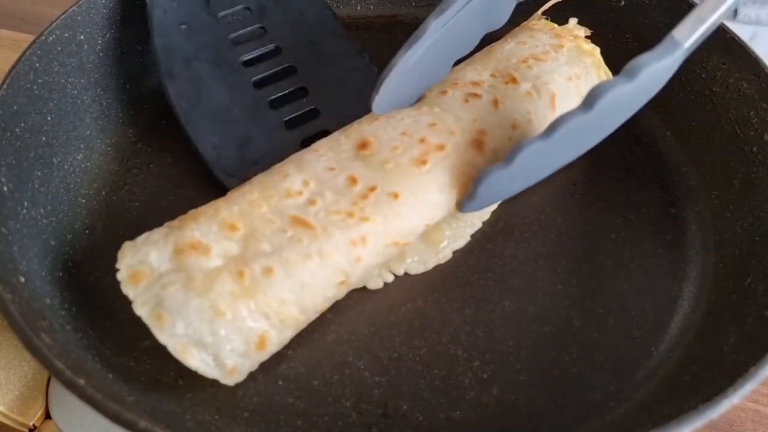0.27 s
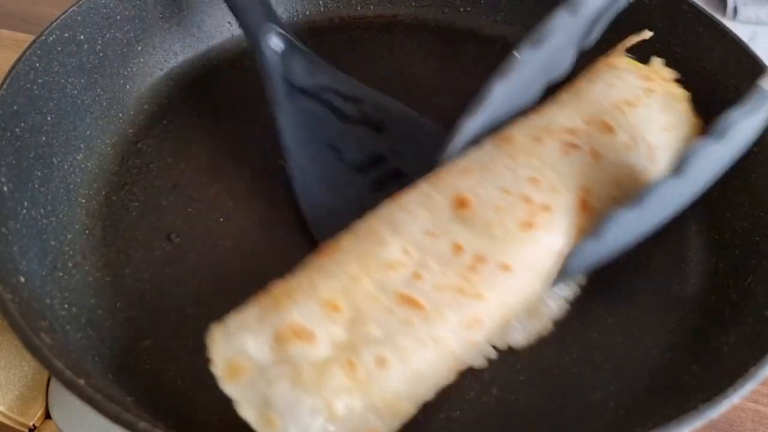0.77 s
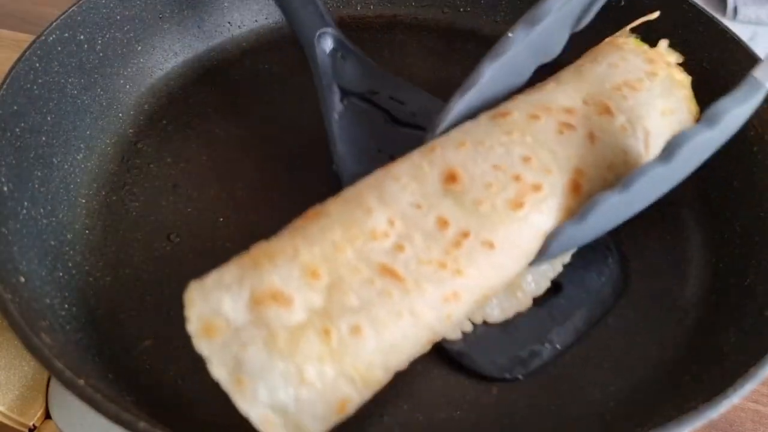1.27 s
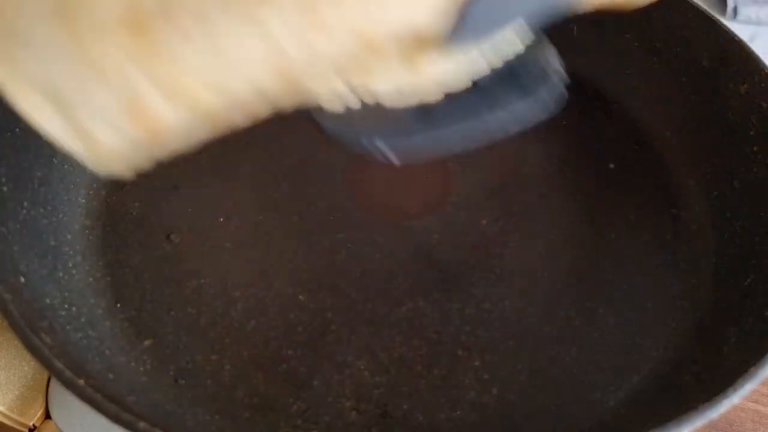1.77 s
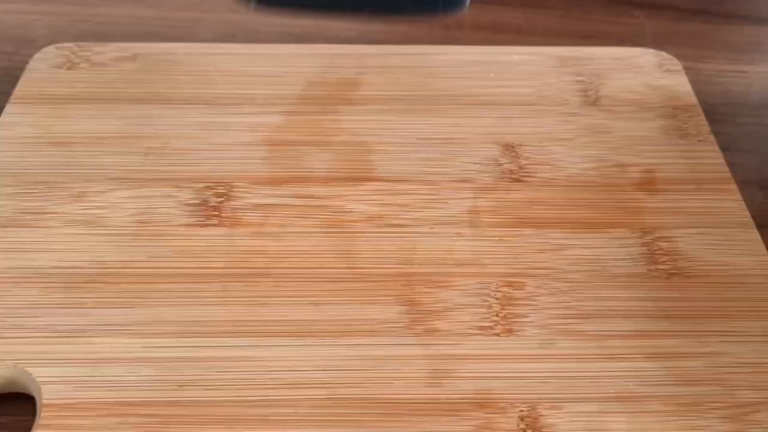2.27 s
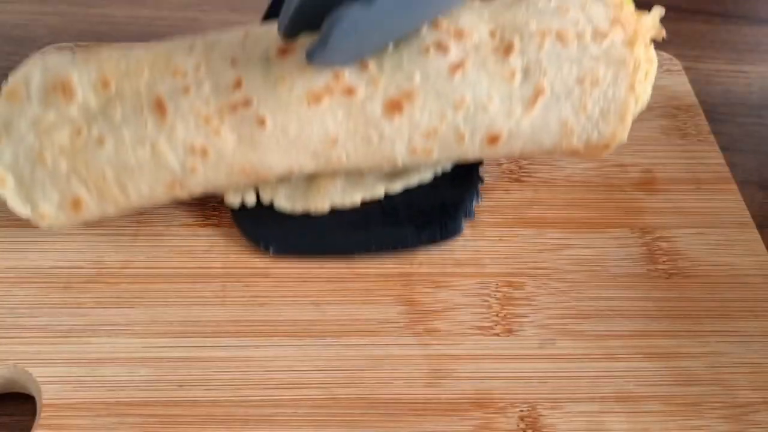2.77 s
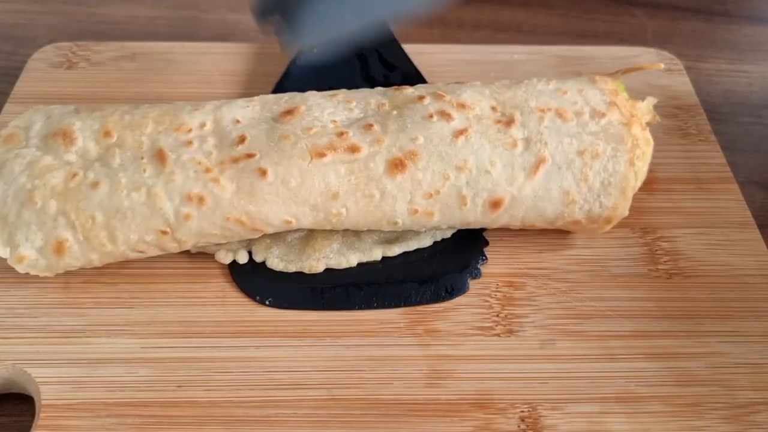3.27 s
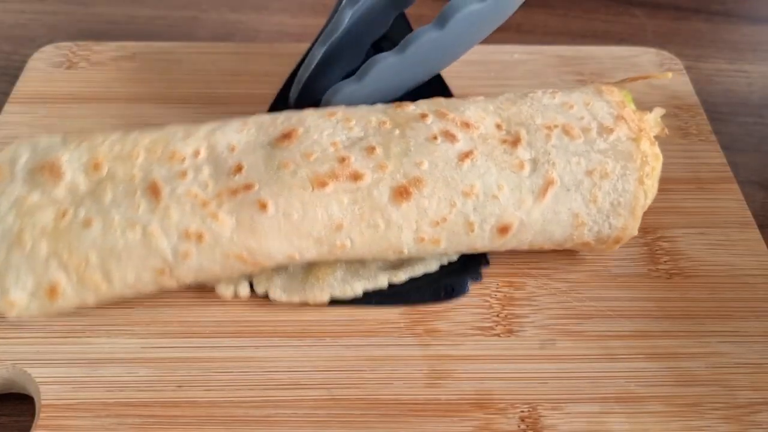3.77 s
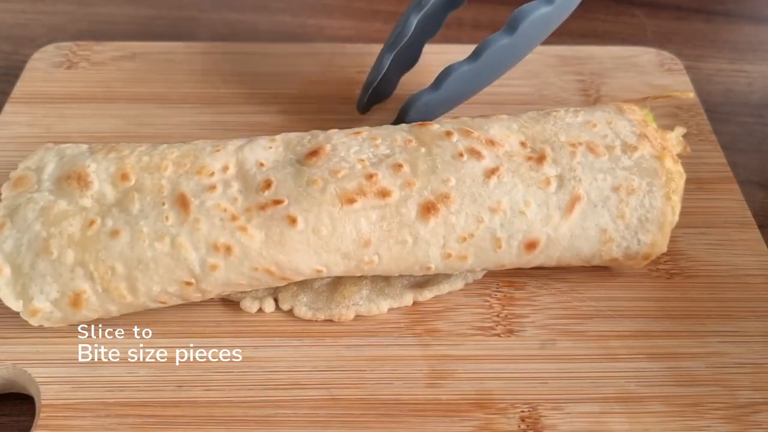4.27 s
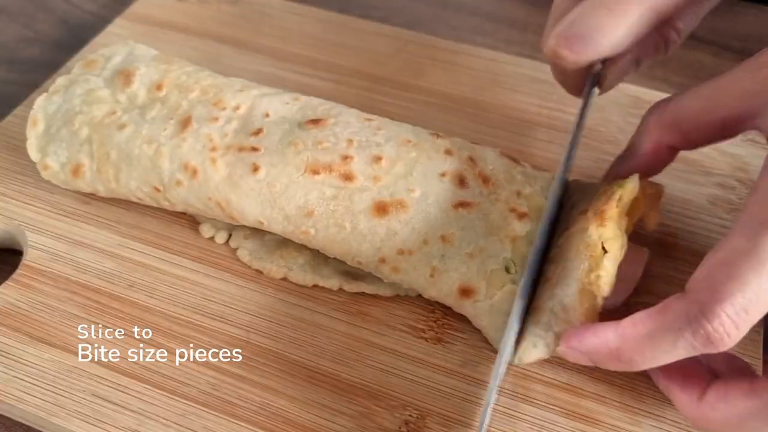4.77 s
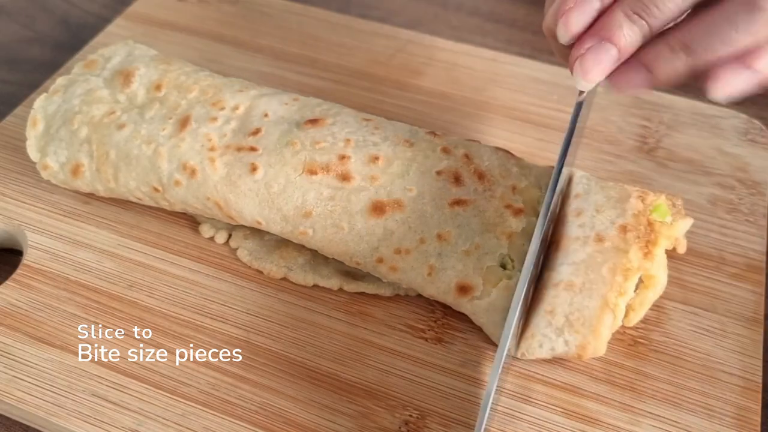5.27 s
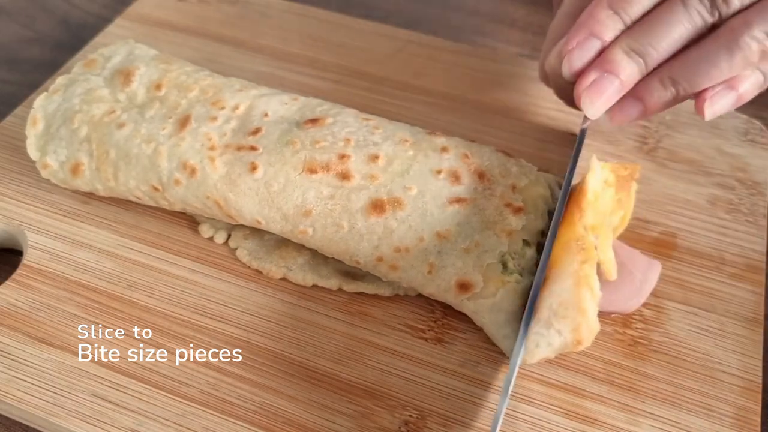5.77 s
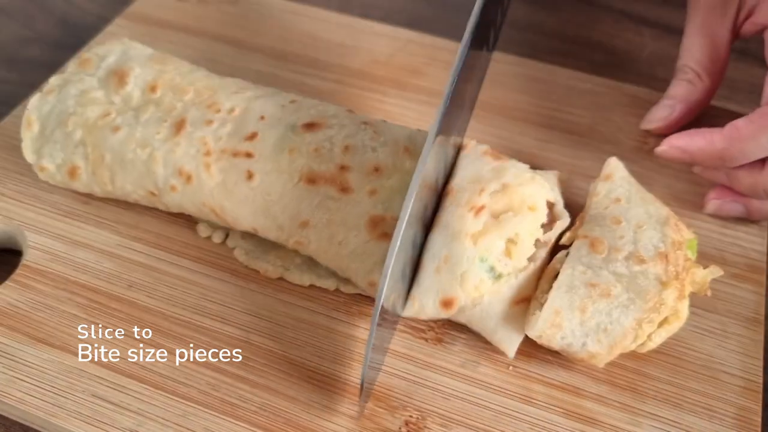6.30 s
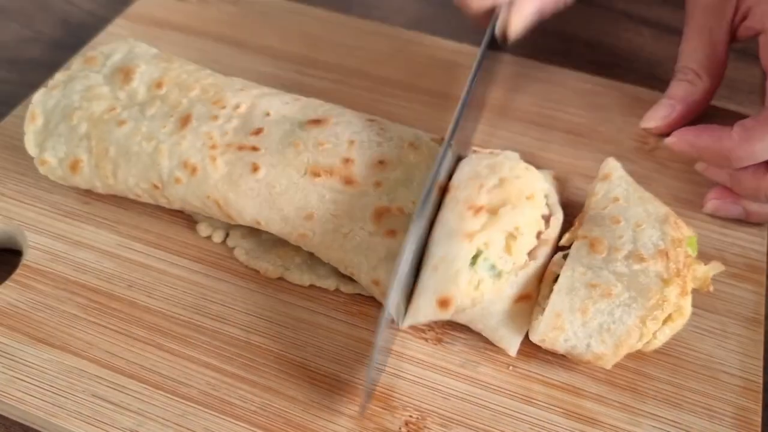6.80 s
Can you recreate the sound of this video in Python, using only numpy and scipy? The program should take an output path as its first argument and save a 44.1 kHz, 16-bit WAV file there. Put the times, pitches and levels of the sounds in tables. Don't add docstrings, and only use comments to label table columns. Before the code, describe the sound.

Close-miked frying: steady fine sizzle over faint low burner rumble, a small ringing knock on the pan, then rough spatula scrapes. The sizzle turns brighter with sharp oil spits, then cuts abruptly to a quiet room. Faint taps, then a spatula drags off a wooden board with a rising squeal. A knife crackles through crust with two hard knocks and low table thuds; the last cut is softer.

```python
import sys
import numpy as np
from scipy import signal
from scipy.fft import rfft, irfft, next_fast_len
from scipy.io import wavfile

SR = 44100
rng = np.random.default_rng(int(sys.argv[2]) if len(sys.argv) > 2 else 0)


def ratio(d):
    e = np.asarray(d, float) / 20
    return 10 ** e


def generate_wav(sig):
    pcm = np.round(np.clip(np.atleast_2d(sig).T, -1, 1) * 32767).astype(np.int16)
    wavfile.write(sys.argv[1], SR, pcm)


N = 310451
T = np.arange(N) / SR

SHOT_EDGES_S = [
    0,
    2.305,
    5.896,
    7.1,
]
# (peak [s], level [dB], rise [s], fall [s], bite [dB])
PAN_STROKES = [(0.56, -30.5, 0.056, 0.06, -3.5), (0.624, -20, 0.12, 0.13, -3.5),
               (0.70, -25.5, 0.065, 0.03, -2), (0.834, -22, 0.02, 0.05, -11),
               (0.866, -20.5, 0.05, 0.1, -2.5), (0.97, -24, 0.093, 0.074, -7),
               (1.085, -21, 0.12, 0.028, -2.5), (1.106, -28.5, 0.03, 0.045, -8.5),
               (1.16, -40, 0.07, 0.07, 2), (1.219, -25, 0.005, 0.03, -6), (1.25, -16.5, 0.035, 0.07, 4.5),
               (1.28, -19, 0.054, 0.028, 5), (1.33, -36.5, 0.038, 0.17, 5)]
# (frequency [Hz], level [dB], t60 [s])
BODY_MODES = [(219.9, -1.5, 0.067), (315.9, 3.5, 0.046), (414, -2, 0.0119), (554, 1, 0.0314)]
# (frequency [Hz], level [dB], t60 [s])
TABLE_MODES = [(79.83, -3.5, 0.248), (132.5, -3.5, 0.1104), (201, -13, 0.0336)]


def rms_one(x):
    return x / np.sqrt(np.mean(x ** 2) + 1e-20)


def filtered(x, order, hz, kind):
    return signal.sosfilt(signal.butter(order, hz, kind, fs=SR, output="sos"), x)


def in_time(*tables):
    columns = []
    for rows in map(np.array, tables):
        columns.append([np.interp(T, rows[:, 0], c, -200, -200) for c in rows[:, 1:].T])
    return np.max(columns, axis=0)


def drift(rate_hz):
    step = 40
    r = np.exp(-2 * np.pi * step * rate_hz / SR)
    slow = signal.lfilter([1], [1, -2 * r, r * r], rng.standard_normal(N // step + 2002))[2000:]
    return np.interp(np.arange(N) / step, np.arange(len(slow)), rms_one(slow))


def colour(x, spectrum):
    hz, db = np.transpose(spectrum)
    size = next_fast_len(N)
    grid = np.log(np.arange(size // 2 + 1) * SR / size + 1)
    gain = ratio(np.interp(grid, np.log(hz), db))
    return rms_one(irfft(rfft(x, size) * gain, size)[:N])


def grains(per_s, spread_db, clump_db):
    born = rng.random(N) < per_s * ratio(clump_db * drift(25)) / SR
    size_db = spread_db * np.minimum(rng.exponential(1, N), 6)
    return born * ratio(size_db) * rng.choice([-1, 1], N)


def layered(x, edges_hz, levels_db, patchy_db, count=2):
    bands = int(count * np.log2(edges_hz[-1] / edges_hz[0]))
    cuts = np.geomspace(edges_hz[0], edges_hz[-1], 1 + bands)
    parts = [filtered(x, 2, c, "band") for c in zip(cuts, cuts[1:])]
    centres, edges = np.log(cuts[1:] * cuts[:-1]) / 2, np.log(edges_hz)
    power, home = np.var(parts, axis=1), np.searchsorted(edges, centres) - 1
    own_db = [10 * np.log10(power[home == k].sum() + 1e-12) for k in range(len(levels_db))]
    wanted = np.array(levels_db) - np.array(own_db)[:, None]
    place = np.interp(centres, (edges[1:] + edges[:-1]) / 2, np.arange(len(wanted)))
    out = 0
    for k, (part, p) in enumerate(zip(parts, place)):
        below, above = wanted[int(p)], wanted[int(np.ceil(p))]
        blend = below * (1 - p % 1) + above * (p % 1)
        out = out + (-1) ** k * part * ratio(blend + patchy_db * drift(22.0))
    return out


def ring(clicks, hz, t60):
    r, w = ratio(-60 / (t60 * SR)), 2 * np.pi * hz / SR
    return signal.lfilter([0, np.sin(w)], [1, -2 * r * np.cos(w), r * r], clicks + 1e-18)


def strike(times, levels_db, modes, soft_s):
    clicks = np.zeros(N)
    clicks[(np.array(times) * SR).astype(int)] = ratio(np.array(levels_db))
    touch = np.hanning(int(soft_s * SR) + 3)
    clicks = np.convolve(clicks, touch / touch.sum())[:N]
    return sum(ratio(db) * ring(clicks, hz, t60) * (-1) ** k for k, (hz, db, t60) in enumerate(modes))


def ticks(rows, cycles, burst_s):
    length = 300
    out, t = np.zeros(N + length), np.arange(length) / SR
    for (s, db, hz, top_db), noise in zip(rows, rng.standard_normal((len(rows), length))):
        swell = t * hz * np.exp(1 - t * hz / cycles) / cycles
        body = np.sin(2 * np.pi * hz * t) * swell
        spray = signal.lfilter([1, -1], [1, -.85], noise * np.exp(-t / burst_s))
        spray_db = min(top_db + 11, db + 1)
        start = int(s * SR)
        out[start:start + length] += ratio(db - 5.5) * body + ratio(spray_db) * spray / np.abs(spray).max()
    return out[:N]


def strokes(rows, ranges=((0, 0, 0), ()), roundness=1.295):
    t = np.arange(N // 16 + 1) * 16 / SR
    out = np.full((len(ranges) - 1, len(t)), -200.)
    for s, db, rise, fall, *bite in rows:
        away = np.where(t < s, (s - t) / abs(rise), (t - s) / abs(fall))
        here = np.searchsorted(SHOT_EDGES_S, t, "right") == np.searchsorted(SHOT_EDGES_S, s, "right")
        level = np.where(here, db - 20 * away ** roundness, -200)
        out = np.maximum(out, [level + gain + share * sum(bite) for _, gain, share in ranges[:-1]])
    return [np.interp(T, t, row) for row in out]


def rubbed(x, rows, ranges, patchy_db, count, roundness=1.295):
    edges_hz = [r[0] for r in ranges]
    return layered(x, edges_hz, strokes(rows, ranges, roundness), patchy_db, count=count)


def sweep(x, hz, width):
    out, state = np.zeros(N), np.zeros(4)
    for i in np.flatnonzero(hz[::256] > 0) * 256:
        r = np.exp(-np.pi * width * hz[i] / SR)
        a = [1, -2 * r * np.cos(2 * np.pi * hz[i] / SR), r * r]
        gain = (1 - r * r) ** 2
        block = x[i:i + 256]
        out[i:i + 256], state = signal.lfilter([gain, 0, -gain], np.convolve(a, a), block, zi=state)
    return out / np.std(out[hz > 0])


def kitchen(x, wet_db):
    t = T[:SR // 2]
    t60_s = 0.424
    tail = rng.standard_normal(len(t)) * ratio(-60 * t / t60_s) * (t > .008)
    tail = filtered(tail, 1, [250, 1500], "band")
    return x + ratio(wet_db) * signal.fftconvolve(x, tail / np.sqrt(np.sum(tail ** 2)))[:N]


def near_reflections(x):
    echoes = [(.013, 0.333), (.029, -0.413), (.047, .45)]   # (delay [s], gain)
    return x + sum(gain * np.roll(x, int(s * SR)) for s, gain in echoes)


def room_tone():
    # (frequency [Hz], density [dB per Hz])
    air_spectrum = [(18, -75), (30, -1.5), (55, 0.5), (100, -7), (353, -9), (382, -18), (413, -8.5),
                    (551, -10.5), (755, -3.5), (1340, -17), (4370, -24), (5830, -26), (15800, -27)]
    # (frequency [Hz], level [dB rms])
    whine = [(3000, -79.5), (6000, -82)]
    tones = sum(ratio(db + 6.5 + 3 * drift(6)) * np.sin(2 * np.pi * hz * T) for hz, db in whine)
    air = colour(rng.standard_normal(N), air_spectrum)
    boom = signal.sosfiltfilt(signal.butter(1, [450, 1100], "band", fs=SR, output="sos"), air)
    boom_lost = 0.697 * (T > SHOT_EDGES_S[2])
    return ratio(-54) * (air - boom_lost * boom) + tones


def frying():
    # (time [s], vigour [dB], bareness of the pan [0-1])
    sizzle = [(0.0, -41, 0.19), (0.43, -40.5, 0), (0.79, -42, 0.11), (1.19, -42.5, 0.1),
              (1.23, -37.5, 0.78), (1.36, -40, 0.64), (1.6, -41.5, 0), (1.7, -38, 0.88), (2.14, -43, 1),
              (2.31, -43, 0.99)]
    # (frequency [Hz], density [dB per Hz])
    fizz_spectrum = [(120, -57), (200, 1.5), (499, -6.5), (621, 5.5), (1040, -4), (2110, -11), (3940, -17),
                     (5400, -16), (7600, -16), (9800, -12), (12500, -2), (14700, 0.5), (15800, -6.5)]
    fizz_edges_hz = [220, 2500, 7000, 10000, 15900]
    covered_db = [-8, -0.03, -2.5, -7.5]
    bare_db = [-20, -1.74, -17, 0.1]
    vigour_db, bare = in_time(sizzle)
    fine = rms_one(grains(9000, spread_db=2.0, clump_db=3.0))
    bursts = signal.lfilter([1], [1, -.96], np.abs(grains(450, spread_db=2.6, clump_db=3.0)))
    share_db = -7 + 6 * np.clip(bare, 0, 1)
    big = rms_one(bursts * rng.standard_normal(N)) * ratio(share_db)
    levels_db = [vigour_db + a + (b - a) * bare for a, b in zip(covered_db, bare_db)]
    return layered(colour(fine + big, fizz_spectrum), fizz_edges_hz, levels_db, patchy_db=1.0, count=3)


def burner():
    # (peak [s], level [dB], rise [s], fall [s])
    jolt = [
        (0.23, -32.5, 0.051, 0.154),
    ]
    flame = filtered(rng.standard_normal(N), 2, [45, 100], "band")
    lift_s, fade_db_per_s = 1.393, 33
    burner_db = -48 - fade_db_per_s * np.maximum(T - lift_s, 0)
    push_db = strokes(PAN_STROKES)[0] - 19.5
    rumble_db = np.max([burner_db, strokes(jolt)[0], push_db], axis=0)
    return ratio(rumble_db) * rms_one(flame)


def spatula_in_pan():
    # (time [s], peak [dB])
    pan_knocks = [
        (0.205, -5),
        (0.2087, -12),
    ]
    # (frequency [Hz], level [dB], t60 [s])
    pan_modes = [(556.3, -3, 0.22), (642, -5.5, 0.33), (765.7, -4, 0.12), (878.6, -1.5, 0.13),
                 (1000, -2, 0.37), (1118, -4, 0.25)]
    blade_modes = [(548, 0, .05), (940, -5, .04), (1400, -12, .015), (2100, -8, .009), (3100, -10, .007)]
    # (frequency [Hz], density [dB per Hz])
    rub_spectrum = [(88, -59), (150, -19.5), (250, -2.5), (460, -89.5), (535, -5), (685, -4), (844, 2.5),
                    (1440, -2.5), (2220, 3.5), (2490, 1.5), (4230, -8), (7480, -25.5), (14000, -29)]
    # (lower edge [Hz], level [dB], share of bite)
    push_ranges = [(273, 0, 0), (1510, -7, 0.906), (4000, -1.3, 0.51), (11000,)]
    catches = grains(6000, spread_db=2.2, clump_db=1.5)
    hum = rms_one(sum(ratio(db) * ring(catches, hz, t60) for hz, db, t60 in pan_modes))
    rub = colour(catches, rub_spectrum) + ratio(-12.5) * hum
    scrape = rubbed(rub, PAN_STROKES, push_ranges, patchy_db=2.0, count=2, roundness=1.452)
    s, db = np.transpose(pan_knocks)
    knock = strike(s, db - 4.0, blade_modes, soft_s=.0001) + strike(s, db - 24, pan_modes, soft_s=0.000346)
    knock = filtered(knock, 2, 440, "high")
    return scrape + kitchen(knock, wet_db=-13)


def oil_spits():
    # (time [s], peak [dB], frequency [Hz], top edge [dB])
    spit_rows = [(0.594, -10, 2630, -18), (0.7246, -9, 13000, -20), (1.3125, -6, 10000, -32),
                 (1.3165, -18.5, 5300, -28), (1.3597, -18, 5510, -28.5), (1.3663, -14, 2630, -20),
                 (1.4045, -10, 4080, -14), (1.482, -18, 5200, -29), (1.6013, -18.5, 5150, -26),
                 (1.7186, -8.5, 12500, -35), (1.8582, -17.5, 10900, -28), (1.884, -18, 10700, -15),
                 (1.95, -14.5, 12100, -33.5), (2.0056, -12.5, 5500, -26.5), (2.0236, -4.5, 11100, -26),
                 (2.0622, -9, 4570, -12), (2.105, -7.5, 12800, -38.5), (2.1175, -16.5, 3550, -25),
                 (2.1712, -14, 3360, -32), (2.2003, -12, 4000, -23), (2.2092, -9.5, 11500, -25.5),
                 (2.2389, -4, 4200, -13), (2.2446, -2.5, 12400, -27.5), (2.2695, -15.5, 12300, -33)]
    return filtered(ticks(spit_rows, cycles=0.638, burst_s=0.00045), 2, 900, "high")


def spatter():
    # (time [s], peak [dB], frequency [Hz], top edge [dB])
    drops = [(1.1902, -23.5, 5400, -36.5), (1.2064, -26, 3620, -40), (1.2164, -24, 3200, -32),
             (1.9214, -31.5, 13600, -32), (1.9667, -19.5, 3500, -44), (1.979, -19.5, 5000, -30),
             (1.9944, -17, 13900, -38), (2.0104, -9.5, 5060, -30), (2.0354, -25, 4620, -31),
             (2.071, -14.5, 6020, -33.5), (2.0834, -20, 11700, -29.5), (2.0886, -19.5, 12800, -29),
             (2.1444, -30.5, 11900, -31.5), (2.2055, -14.5, 11000, -35.5), (2.2458, -13, 12000, -28.5),
             (2.2844, -22, 9370, -36), (2.2964, -16.5, 11200, -38.5)]
    return ticks(drops, cycles=0.7, burst_s=0.00044)


def clacks():
    # (time [s], peak [dB], frequency [Hz], top edge [dB])
    clack_rows = [
        (5.0685, -15, 1713, -35),
        (5.745, -15.5, 1000, -47),
        (5.748, -16.5, 2437, -51.5),
        (3.984, -8.5, 2060, -43.5),
        (4.108, -16, 2580, -46),
        (4.234, -2, 3940, -32),
        (4.327, -17.5, 1404, -42),
        (1.2472, -4, 2600, -30),
    ]
    return ticks(clack_rows, cycles=2.08, burst_s=0.00077)


def bubble_pops():
    # (time [s], peak [dB], frequency [Hz], top edge [dB])
    pop_rows = [(1.3014, -23, 5590, -27), (1.3494, -17.5, 5410, -27), (1.3584, -23, 5510, -27),
                (1.3663, -20.5, 5330, -27), (1.4212, -22, 5750, -39), (1.4254, -24.5, 5000, -35),
                (1.4364, -28.5, 5520, -38), (1.4484, -24.5, 5130, -36.5), (1.4694, -28, 5090, -37),
                (1.4904, -23.5, 5540, -38.5), (1.5904, -28, 5040, -34), (1.7599, -30.5, 5640, -32),]
    return ratio(-3.0) * ticks(pop_rows, cycles=3.0, burst_s=.0015)


def hollow():
    # (peak [s], level [dB], rise [s], fall [s])
    swells = [
        (1.32, -43.5, .04, 0.087),
        (1.45, -47, 0.053, 0.103),
    ]
    fizz = ring(grains(900, spread_db=2.5, clump_db=6.5), 5300, .0025)
    return ratio(strokes(swells)[0]) * rms_one(fizz)


def blows(rows):
    # (frequency [Hz], level [dB], t60 [s])
    face_modes = [(847, -1, 0.0046), (922, 1, 0.01793), (1043, -11, 0.0084), (1748, -22.5, 0.017),
                  (2480, -31, 0.022)]
    loose_modes = [(314.8, -10, 0.135), (599.4, -6.5, 0.117), (717.2, -8.5, 0.126), (794.4, -5.5, 0.17),
                   (883.4, -4.5, 0.157), (999, -12, 0.2), (1064.7, -10.5, 0.07), (1162, -8, 0.062),
                   (1288.5, -13, .08)]
    s, knock_db, body_db, thud_db = np.transpose(rows)
    face = strike(s, knock_db + .5, face_modes, soft_s=0.00016)
    body = strike(s, body_db + 4.5, BODY_MODES, soft_s=0.000564)
    loose = strike(s, body_db - 0.5, loose_modes, soft_s=0.000576)
    thud = strike(s, thud_db - 0.5, TABLE_MODES, soft_s=0.0022)
    return kitchen(face + body, wet_db=-22) + near_reflections(loose) + thud


def table_shake():
    # (peak [s], level [dB], rise [s], fall [s])
    leans = [(2.36, -47.5, 0.068, 0.13), (3.72, -49, 0.047, 0.574), (4.2, -42.5, 0.194, 0.246),
             (4.5, -45.5, 0.021, 0.05), (4.78, -33, 0.0767, 0.134), (4.98, -40, 0.097, 0.085),
             (5.08, -24, 0.0163, 0.0975), (5.58, -27.5, 0.064, 0.159), (5.77, -24.5, 0.03, 0.085),
             (5.89, -27.5, 0.087, 0.1), (5.92, -63.5, 0.03, 0.037), (6.37, -51.5, 0.214, 0.096),
             (6.63, -42.5, 0.031, 0.13), (6.92, -31, 0.027, 0.059), (6.965, -29, 0.05, 0.098)]
    push = rng.standard_normal(N)
    swing = sum(ratio(db) * ring(push, hz, 0.89 * t60) * (-1) ** k
                for k, (hz, db, t60) in enumerate(TABLE_MODES))
    creak = sum(ratio(db) * ring(push, hz, t60) for hz, db, t60 in BODY_MODES[:2])
    level_db = np.maximum(strokes(leans)[0], -65.5)
    return ratio(level_db - 2.5) * (rms_one(swing) + ratio(-6.0) * rms_one(creak))


def drag():
    # (peak [s], level [dB], rise [s], fall [s], bite [dB])
    drag_strokes = [(3.011, -41, 0.01, 0.042, -3), (3.12, -49, 0.175, 0.085, 3),
                    (3.188, -37, 0.025, 0.093, -4.5), (3.235, -40, 0.06, 0.06, -4.5),
                    (3.275, -36.5, 0.053, 0.0246, -7), (3.38, -53, 0.104, 0.116, -0.5),
                    (3.546, -41, 0.0567, 0.061, 0), (3.784, -36.5, 0.0145, 0.039, 1),
                    (3.982, -28, 0.1567, 0.246, 6.5), (4.08, -30.5, 0.206, 0.21, 11),
                    (4.18, -28, 0.169, 0.169, 12.5), (4.195, -39, 0.071, 0.055, 24),
                    (4.279, -29, 0.315, 0.049, 10.5), (4.328, -34, 0.0083, 0.015, 9.5),
                    (4.345, -45.5, 0.03, 0.126, 4)]
    # (frequency [Hz], density [dB per Hz])
    wood_spectrum = [(120, -64), (200, -25.5), (273, -16), (372, -18), (455, -10), (693, -5), (896, 5.5),
                     (1020, 1.5), (3100, 2), (4080, -2.5), (7740, -9), (12200, -2), (15800, -9)]
    # (lower edge [Hz], level [dB], share of bite)
    drag_ranges = [(200, 0, 0), (762, -4.5, 0.738), (3230, -6, 1), (9100, -31.5, 1.52), (15900,)]
    # (time [s], level [dB], resonance [Hz])
    short_gap = [(3.17, -61.5, 1500), (3.19, -47.5, 1500), (3.23, -46, 1800), (3.275, -43, 2200),
                 (3.295, -60.5, 2200)]
    long_gap = [(3.82, -50, 1920), (3.98, -22, 2314), (4.12, -26, 2500), (4.18, -24.5, 2900),
                (4.22, -32.5, 3120), (4.24, -16.5, 3690), (4.286, -14, 3320), (4.321, -33.5, 3440),
                (4.47, -55.5, 3600)]
    rub = colour(grains(6000, spread_db=1.0, clump_db=2.5), wood_spectrum)
    gap_db, gap_hz = in_time(short_gap, long_gap)
    oily = grains(6000, spread_db=1.5, clump_db=4.5)
    gap = ratio(gap_db) * sweep(oily, gap_hz, width=0.554)
    return rubbed(rub, drag_strokes, drag_ranges, patchy_db=-1.0, count=3) + gap


def tongs():
    # (time [s], peak [dB], frequency [Hz], top edge [dB])
    releases = [(3.0056, -26, 1900, -54), (3.139, -30, 3200, -59), (3.338, -29, 3450, -64),
                (3.3475, -19.5, 3150, -59.5), (3.3873, -24, 2900, -46), (3.4465, -34.5, 2980, -65.5),
                (3.528, -30, 2500, -62.5), (3.715, -21.5, 2508, -52)]
    return ticks(releases, cycles=.75, burst_s=.001)


def sway():
    # (peak [s], level [dB], rise [s], fall [s])
    swings = [(4.27, -41, 0.061, .06), (4.316, -33, 0.027, 0.0184), (4.365, -40, 0.042, .08),
              (4.41, -44, .08, 0.045), (5.55, -31.5, 0.0218, 0.046), (5.69, -31.5, 0.12, 0.091),
              (5.87, -33.5, 0.037, 0.055)]
    return ratio(strokes(swings, roundness=1.69)[0] + 2.5) * np.sin(2 * np.pi * 82.95 * T)


def squeaks():
    # (time [s], level [dB], frequency [Hz], length [s])
    slips = [
        (4.325, -22.5, 3008, 0.00606),
        (4.546, -48, 10800, 0.0128),
        (5.522, -22, 6197, 0.01266),
    ]
    out = 0
    for s, db, hz, length in slips:
        noise = filtered(rng.standard_normal(N), 1, [hz * 1.03, hz * 1.1], "band")
        swell = np.clip(1 - ((T - s) / length * 2 - 1) ** 2, 0, 1)
        out = out + ratio(db) * rms_one(noise) * swell
    return out


def saw():
    # (peak [s], level [dB], rise [s], fall [s], bite [dB])
    saw_strokes = [(4.554, -43.5, 0.05, 0.0336, 5), (4.72, -57, 0.048, 0.1, 6),
                   (4.804, -28.5, 0.07, 0.091, 3), (4.844, -32.5, 0.088, 0.0245, 8.5),
                   (4.88, -40.5, 0.053, 0.089, 5), (4.95, -51.5, 0.0115, 0.13, 10),
                   (5.082, -27, 0.0217, 0.082, -8.5), (5.109, -30.5, 0.038, 0.157, -11),
                   (5.532, -40, 0.0434, 0.1, 15.5), (5.59, -32.5, 0.094, 0.058, -6.5),
                   (5.7, -49, 0.076, 0.091, 7), (5.772, -37, 0.059, 0.036, 8),
                   (5.835, -40.5, 0.0243, 0.029, 12.5), (5.86, -35.5, 0.0214, 0.0214, 10),
                   (5.885, -33.5, 0.026, 0.057, 6), (6.1, -61.5, 0.18, 0.089, 8),
                   (6.21, -51, 0.0197, 0.045, -0.5), (6.31, -56.5, 0.033, 0.12, 13.5),
                   (6.371, -55.5, 0.106, 0.084, 15.5), (6.5, -49.5, 0.077, 0.099, 1.5),
                   (6.93, -30, 0.0475, 0.227, 1), (7.0, -36.5, 0.08, 0.045, -1)]
    # (frequency [Hz], density [dB per Hz])
    crust_spectrum = [(190, -7.5), (330, -11.5), (394, -16.5), (545, -11), (641, -16), (976, -1.5),
                      (1310, -11), (3620, -2), (4120, -2), (14800, 1), (15800, -22)]
    # (lower edge [Hz], level [dB], share of bite)
    saw_ranges = [(345, 0, 0), (1182, 0.1, 0.96), (6630, -11.5, 0.902), (15800,)]
    tear = rms_one(grains(2600, spread_db=2.5, clump_db=3.5)) + 0.244 * rng.standard_normal(N)
    return rubbed(colour(tear, crust_spectrum), saw_strokes, saw_ranges, patchy_db=2.5, count=2)


def crust_snaps():
    # (time [s], peak [dB], frequency [Hz], top edge [dB])
    snap_rows = [(4.5116, -25.5, 2960, -47.5), (4.7005, -28.5, 3360, -43), (4.7405, -25, 2540, -35.5),
                 (4.758, -21.5, 3100, -36), (4.782, -26.5, 2700, -12.5), (4.83, -21.5, 3540, -35.5),
                 (4.8465, -10, 3400, -16), (4.95, -17.5, 4060, -32.5), (5.0013, -30, 5600, -41),
                 (5.033, -30, 3930, -46), (5.243, -34, 3310, -43), (5.328, -32, 3284, -38),
                 (5.369, -29, 4700, -53), (5.384, -28, 2655, -45), (5.4745, -45.5, 4810, -63.5),
                 (5.495, -25, 2400, -37), (5.5721, -12, 10250, -24.5), (5.6286, -17, 5040, -22),
                 (5.64, -14.5, 4480, -53), (5.6774, -31, 3640, -42), (5.718, -32.5, 8000, -43.5),
                 (5.703, -18.5, 4100, -49), (5.7481, -4.5, 5030, -32.5), (5.89, -18, 2480, -48.5),
                 (5.9208, -38, 3050, -58.5), (5.9378, -28, 3630, -40.5), (5.9644, -36, 3230, -44.5),
                    (6.051, -38, 2840, -39.5), (6.107, -29.5, 3260, -56), (6.205, -23.5, 2530, -61),
                    (6.34, -32, 2190, -41), (6.3703, -26, 2480, -41.5), (6.4074, -17.5, 3370, -39.5),
                    (6.4726, -36.5, 2170, -43), (6.576, -36, 2940, -47)]
    return ticks(snap_rows, cycles=.75, burst_s=.001)


def crumbs():
    # (time [s], peak [dB], frequency [Hz], top edge [dB])
    cracks = [(4.535, -35.5, 1955, -55), (4.5984, -34.5, 3020, -47), (4.6224, -35, 3170, -50),
              (4.7104, -28, 3080, -45.5), (4.7314, -27, 2520, -39), (4.7744, -21.5, 2680, -35),
              (4.7895, -19.5, 2700, -29), (5.0873, -24.5, 3380, -40.5), (5.0974, -13.5, 4040, -42),
              (5.1114, -25, 2450, -47), (5.1824, -26, 3210, -52.5), (5.996, -42, 2997, -63.5),
              (6.0334, -33, 6980, -50), (6.0706, -36.5, 3500, -52.5), (6.1144, -36.5, 2510, -60.5),
              (6.196, -34.5, 2560, -56.5), (6.3091, -34, 3080, -59), (6.3214, -31.5, 5180, -53),
              (6.347, -24.5, 5780, -44), (6.3604, -35, 2530, -47), (6.3824, -32, 2480, -54.5),
              (6.3964, -30.5, 3040, -45), (6.4507, -38, 2190, -58), (6.4837, -31, 1710, -46),
              (6.4874, -34.5, 3820, -48.5), (6.5186, -29.5, 2600, -59), (6.544, -32.5, 2730, -54),
              (6.5597, -33, 5500, -51), (6.869, -37.5, 1607, -57.5), (6.8903, -28, 2240, -35.5),
              (6.9112, -25, 3160, -33)]
    return ratio(-2.0) * ticks(cracks, cycles=0.73, burst_s=0.0014)


def press():
    # (time [s], level [dB])
    s, db = (5.603, -14.5)
    return strike([s], [db], TABLE_MODES[:1], soft_s=0.0017)


def wet_thread():
    # (time [s], length [s], from [Hz], to [Hz], level [dB])
    s, length, from_hz, to_hz, db = (6.237, .025, 5400, 4000, -63)
    u = np.clip((T - s) / length, 0, 1)
    turns = length * (from_hz * u + (to_hz - from_hz) * u ** 2 / 2)
    return ratio(db) * np.sin(np.pi * u) * np.sin(2 * np.pi * turns)


def scene():
    # (time [s], knock peak [dB], board body [dB], table thud [dB])
    blow_rows = [(2.312, -56, -54, -41), (3.004, -25.5, -51, -50.5), (3.714, -28, -40.5, -43.5),
                 (4.947, -33.5, -47.5, -20), (5.068, 1, -19.5, -23), (5.242, -28, -46, -33.5),
                 (5.601, -29, -36, -15), (5.747, 0, -22.5, -13.5), (5.889, -15, -34, -43.5),
                 (6.205, -30.5, -52.5, -42.5), (6.621, -21, -35.5, -45)]
    last_shot_s = SHOT_EDGES_S[2]
    early = [row for row in blow_rows if row[0] < last_shot_s]
    late = [row for row in blow_rows if row[0] > last_shot_s]
    pan = frying() + burner() + spatula_in_pan() + oil_spits()
    hands = ratio(-2.0) * (drag() + saw()) + tongs() + crust_snaps() + squeaks() + table_shake() + press()
    sounds = [pan, blows(early) + hands, blows(late) + hands * (T > last_shot_s)]
    shots = 0
    for x, start, end in zip(sounds, SHOT_EDGES_S, SHOT_EDGES_S[1:]):
        shots = shots + filtered(x, 2, 45, "high") * (T >= start) * (T < end)
    cracks = spatter() + clacks() + bubble_pops() + crumbs() + wet_thread()
    return (shots + room_tone() + cracks + hollow() + sway())[None]


def roll_off(x):
    return signal.sosfilt(signal.butter(12, 16830, fs=SR, output="sos"), x)


def record(dry):
    low_pass = signal.cheby2(12, 28, 15650, fs=SR, output="sos")
    mix = signal.sosfilt(low_pass, np.clip(dry, -.93, .93))
    return roll_off(mix)


dry = scene()
out = record(dry)
generate_wav(out)
```